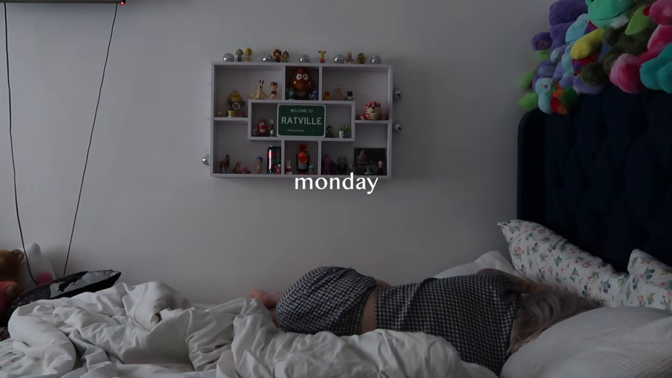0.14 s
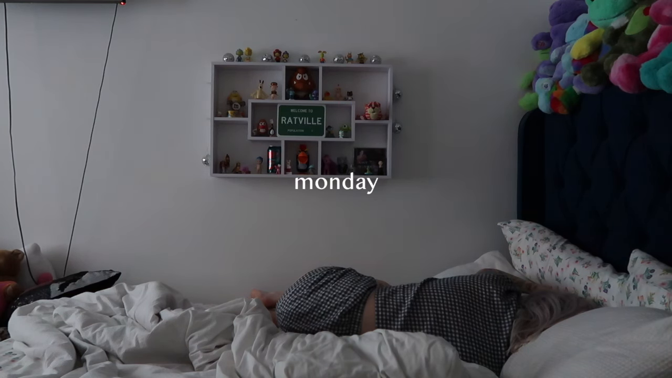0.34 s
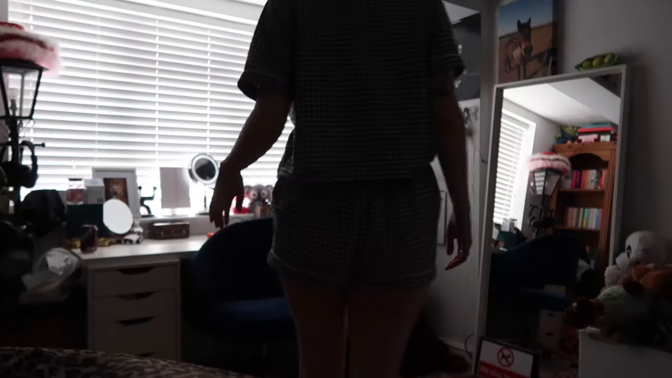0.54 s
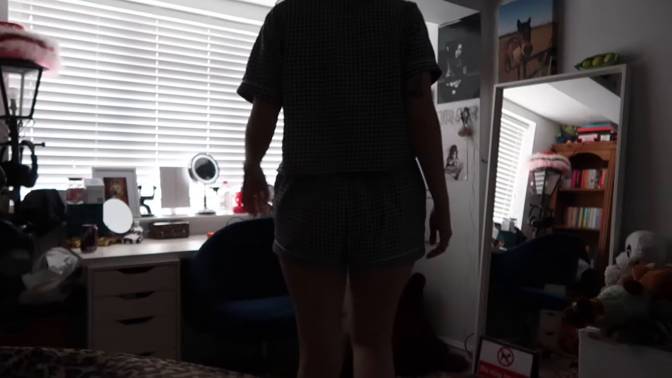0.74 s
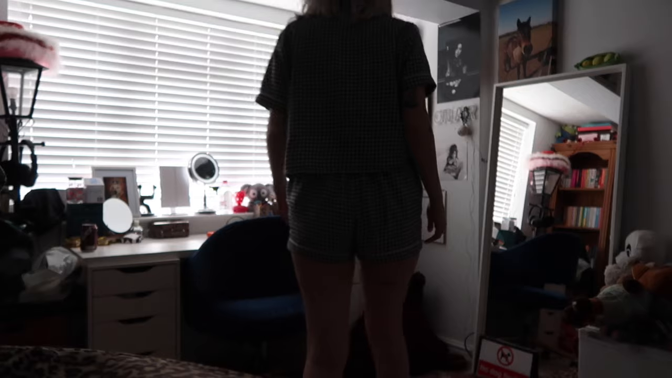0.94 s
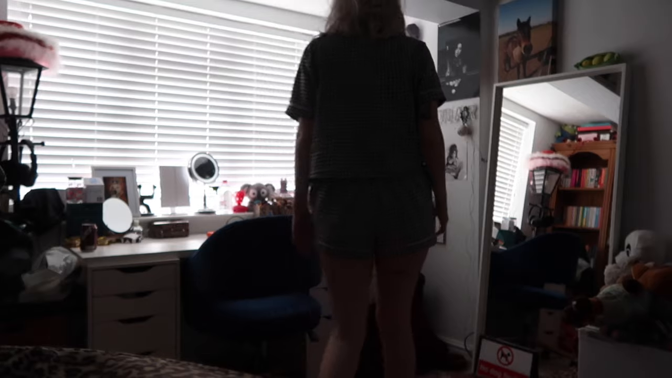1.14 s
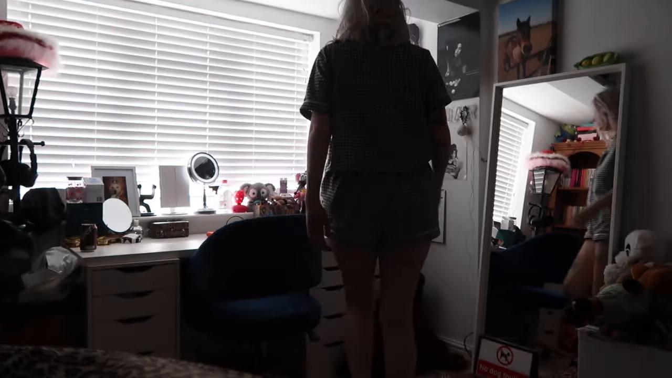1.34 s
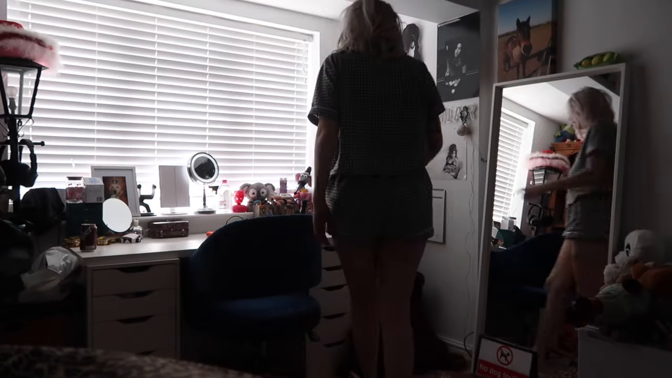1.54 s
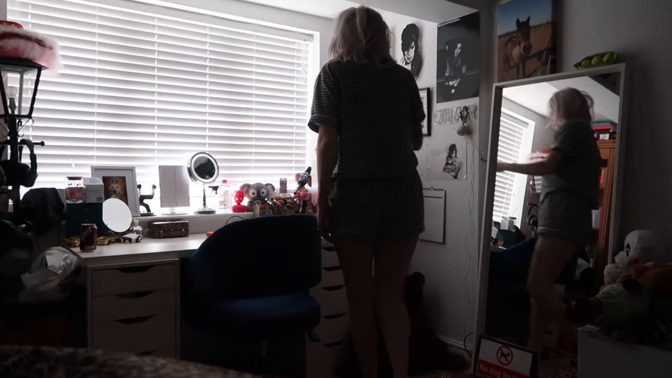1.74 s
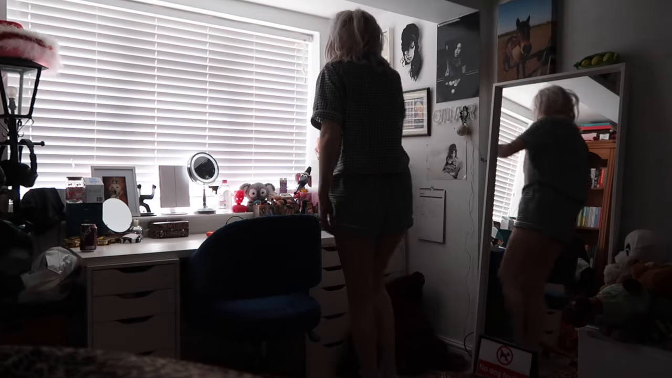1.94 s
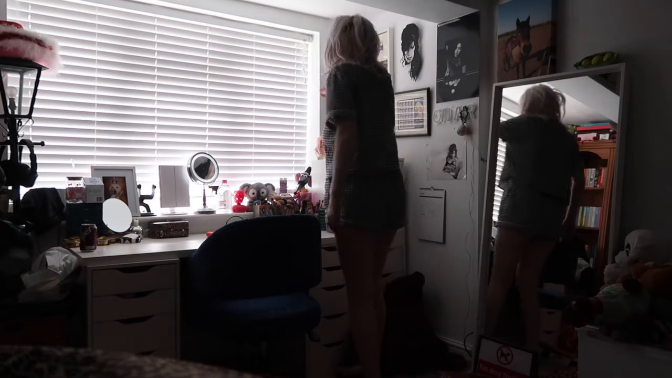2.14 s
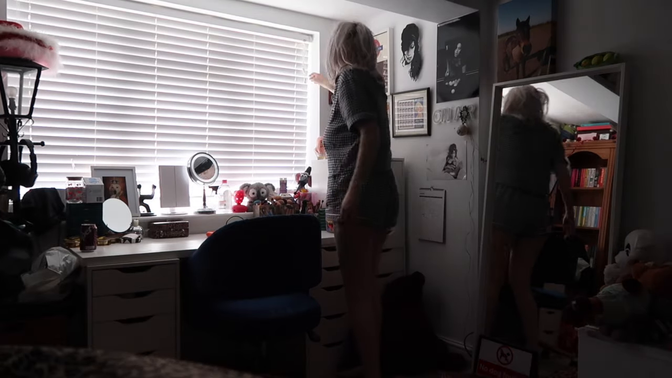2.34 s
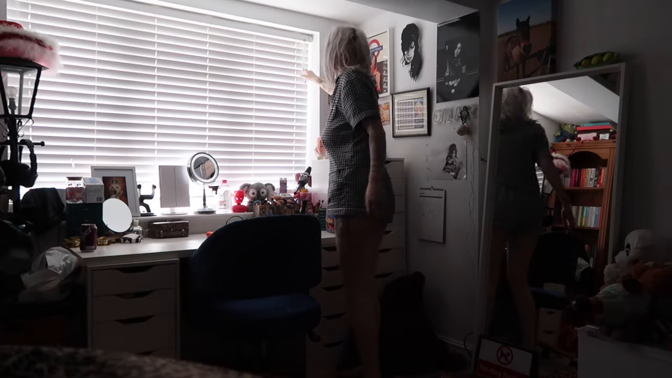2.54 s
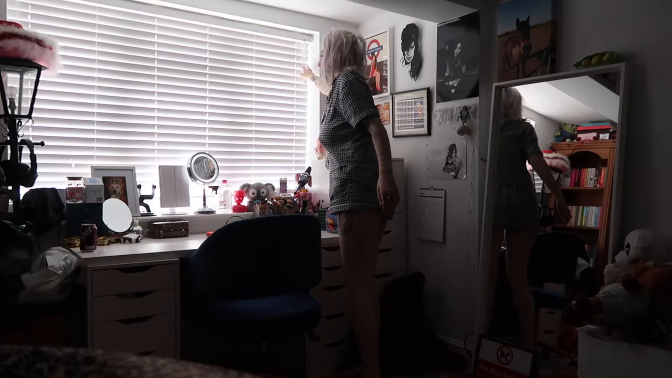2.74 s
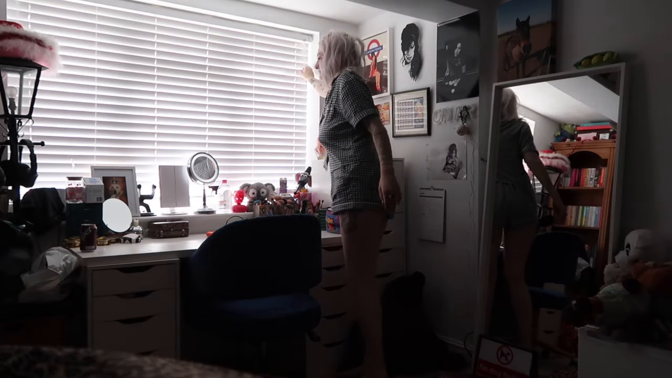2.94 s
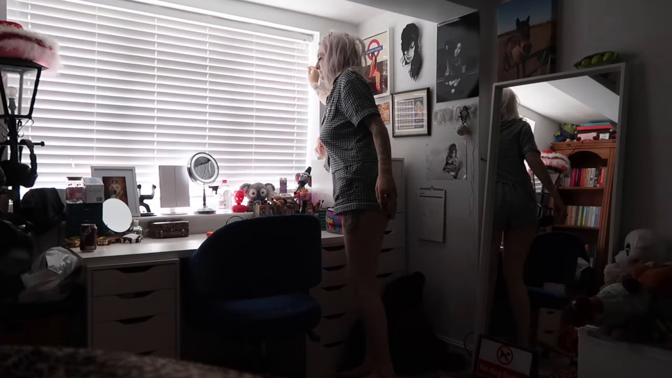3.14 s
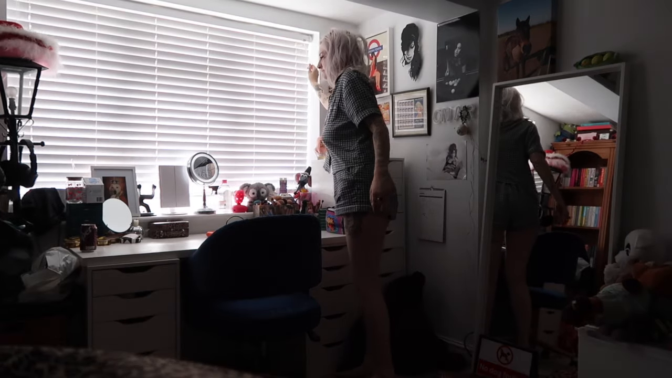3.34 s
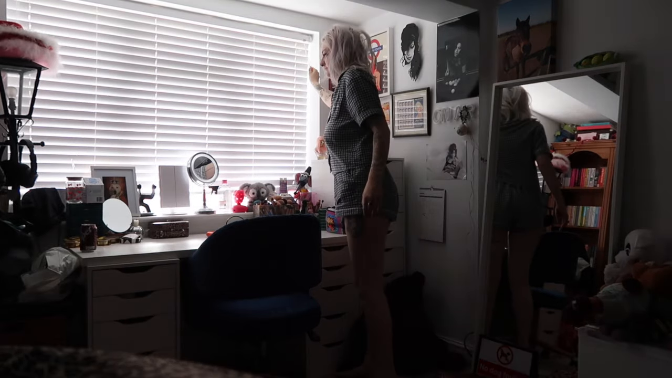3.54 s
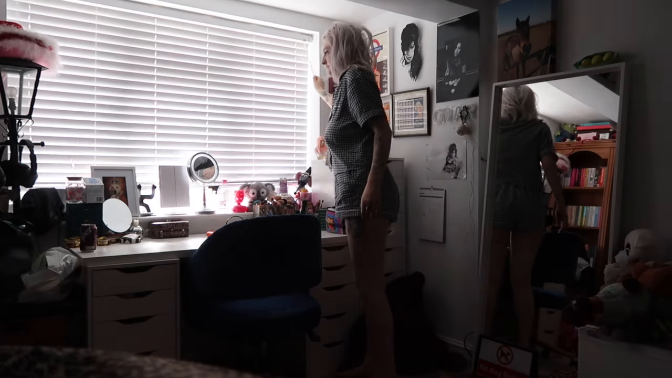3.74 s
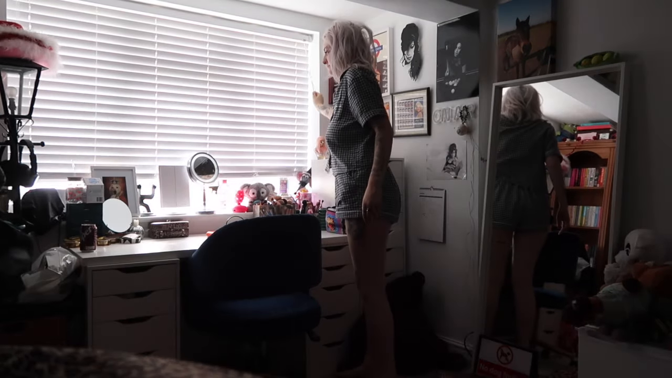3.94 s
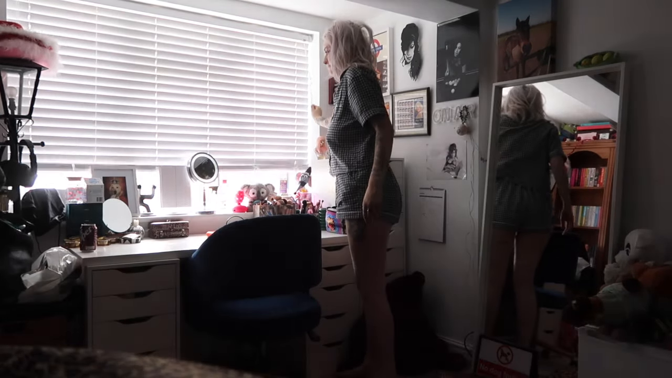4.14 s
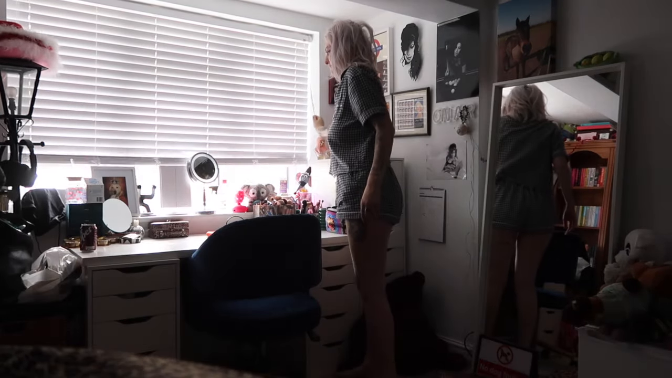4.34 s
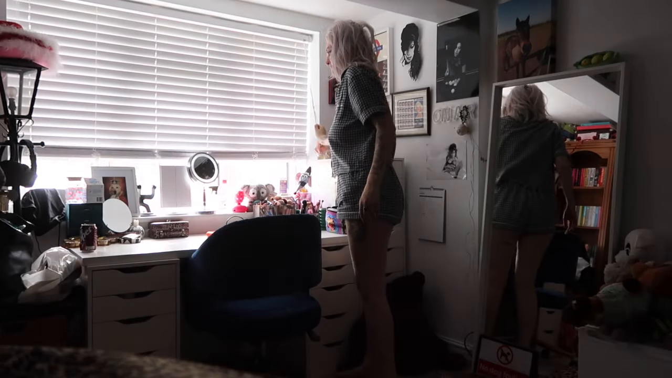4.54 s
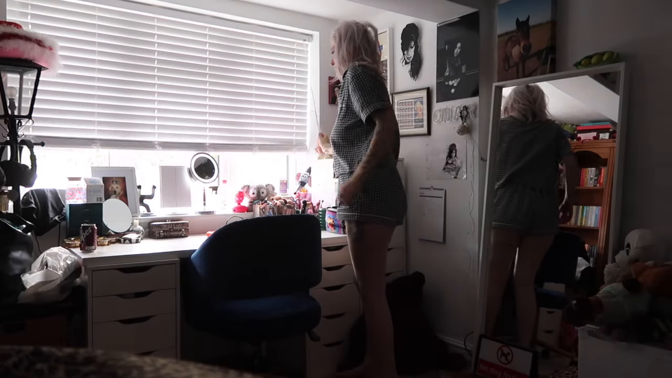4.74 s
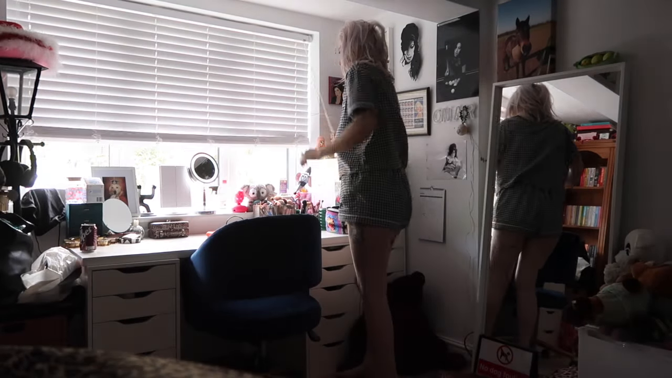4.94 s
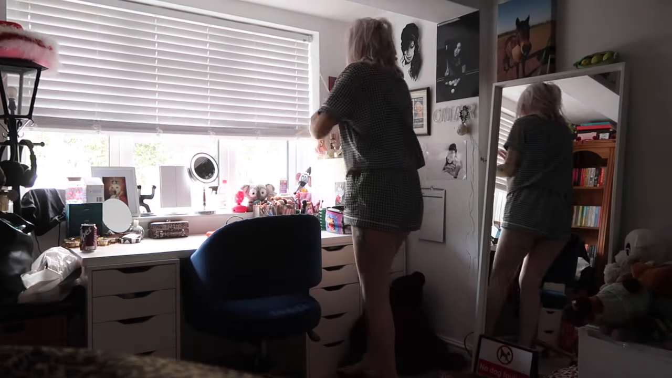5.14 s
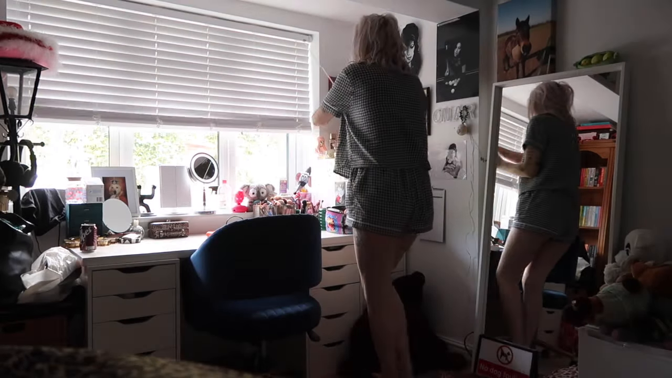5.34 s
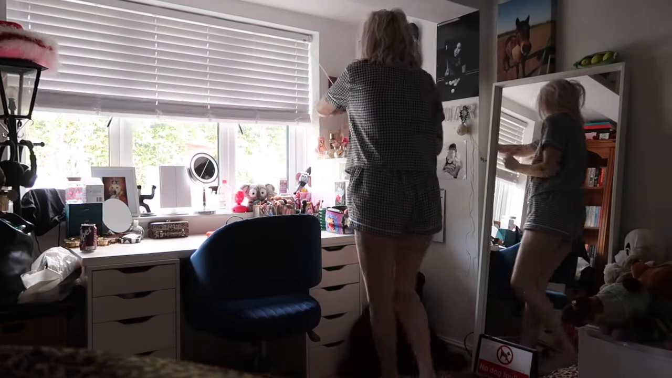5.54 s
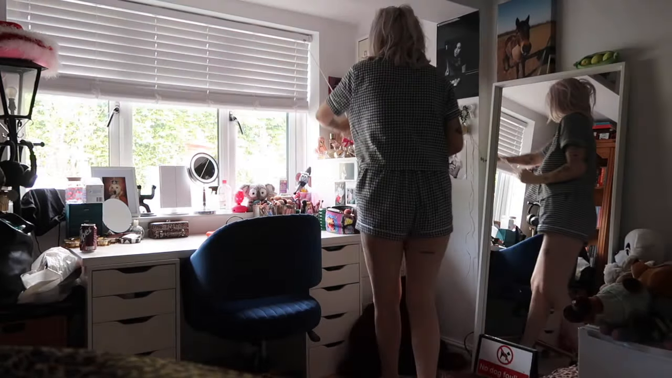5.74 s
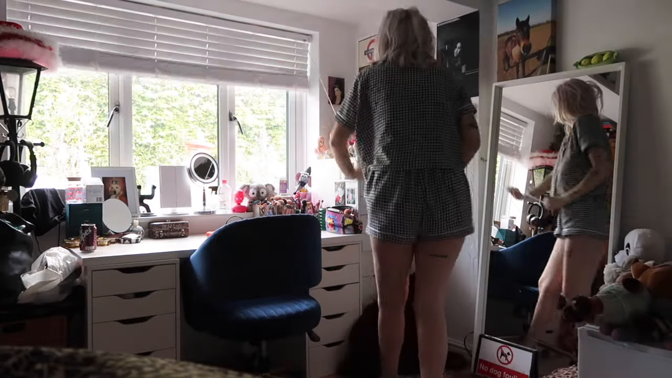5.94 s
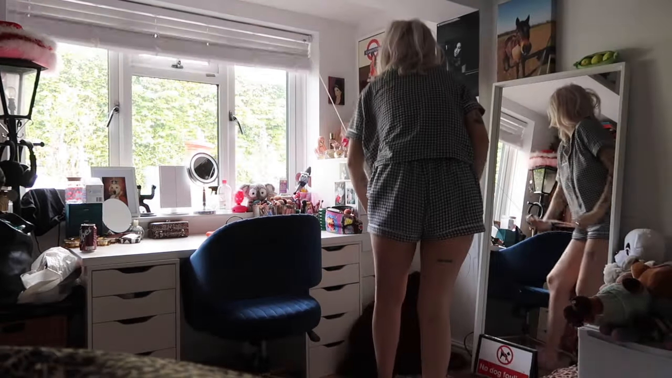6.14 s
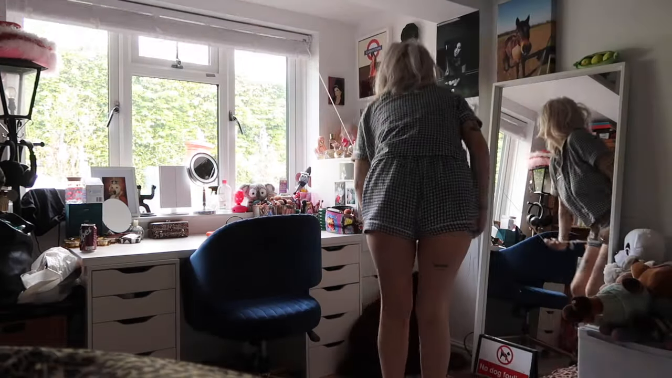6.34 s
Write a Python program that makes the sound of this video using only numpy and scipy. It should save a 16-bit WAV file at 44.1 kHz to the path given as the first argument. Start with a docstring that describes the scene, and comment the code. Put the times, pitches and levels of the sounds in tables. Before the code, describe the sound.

A quiet small bedroom, short soft reflections, faint low hum and hiss in close stereo. From 0.4 to 0.7 s dull footfalls knock the wooden floor; more come at 1.1 to 1.2 s with low thuds and small cracks, then softer ones near 1.7 s and the strongest, a sharp board crack, at 1.83 s. A light step at 2.3 s, then faint cord rustle, thin high squeaks and small slat ticks until 3.1 s. Clicks at 3.25 to 3.35 s begin the pull; scraping grows, with a cluster of clacks and rail bumps at 3.9 to 4.3 s. A short low groan at 4.4 s, then a steady raspy whirr, rising in pitch from 5.4 s, with brief chirps. From 5.8 s the rasp surges and slats snap hard and bright, loudest at 5.93 to 6.08 s, ringing briefly; last bumps follow to 6.35 s.

```python
"""Hauling up a slatted blind

Someone crosses a small bedroom over knocking floorboards, takes the cord of a blind and hauls it up.
Random touches, filtered and ringing, make the steps and slats; tiny slips and unsteady tones make the cord.
The slats shuffle as they gather and the stack clatters at the top, over a faint hum and hiss in stereo.
Levels in the tables are relative: gains on the layers trim them.
"""
import sys
import numpy as np
from scipy import signal
from scipy.fft import rfft, irfft, next_fast_len
from scipy.io import wavfile

SR = 44100
rng = np.random.default_rng(int(sys.argv[2]) if len(sys.argv) > 2 else 0)


def to_wav(sig):
    """Store sig (one row per channel, or 1-D mono) as 16-bit WAV at the path in sys.argv[1].

    Samples outside -1..1 are clipped; the rate is SR.
    """
    pcm = np.clip(np.atleast_2d(sig), -1, 1) * 32767
    pcm = np.round(pcm).astype(np.int16)
    wavfile.write(sys.argv[1], SR, pcm.T)  # frames by channels


N = 280957
TIME = np.arange(N) / SR

# tone colour of the slats: (frequency [Hz], level [dB])
SLAT_COLOUR = [(60, -22), (150, -32), (215, -10), (330, -4.5), (1000, 4), (1600, 3), (2400, 2.5),
               (3300, 4.5), (5000, -5), (7500, -16), (10500, -28), (15000, -39)]
# ringing tones of the blind: (frequency [Hz], level [dB], time to fall by 60 dB [s])
BLIND_RINGING = [(401, 7, 0.4), (513, 5, 0.15), (687, 11, 0.3), (819, 15, 0.42), (1012, 14, 0.36),
                 (1210, 7.5, 0.5), (1346, 14, 0.55), (1384, 10, 0.4), (1890, 9, 0.25), (2985, 0, 0.3),
                 (3166, 4.5, 0.4), (3342, 6, 0.4)]
# ringing tones of the headrail, the box the cord runs through: (frequency [Hz], level [dB], 60 dB fall [s])
HEADRAIL_RINGING = [(486, 3.5, 0.045), (836.5, 10, 0.079), (1212, -17, 0.14), (1330, 0, 0.032)]
# how freely the blind and its headrail ring over time: (time [s], ring level [dB])
RING_FREEDOM = [(3.3, -7), (4.2, -22), (4.7, -15), (5.95, -3), (6.08, -8)]
# the hand takes the cord: (time [s], cord rasp level [dB])
FIRST_TOUCH = (2.3, -67.5)


def undb(db):
    """Turn decibels into gain."""
    return 10 ** (np.asarray(db) / 20)


def unit(x):
    """Scale to an average (rms) strength of 1."""
    return x / np.sqrt(np.mean(x ** 2))


def follow(points, at=TIME, before=None):
    """Read a (time, value) table with straight lines between its points."""
    return np.interp(at, *np.transpose(points), left=before)


def shape(points, hz):
    """Read a (frequency, dB) table at the given frequencies, on a pitch-like scale."""
    f, db = np.transpose(points)
    return np.interp(np.log(hz + 1), np.log(f), db)


def convolve(x, response):
    """Filter x with a response and keep its length."""
    return signal.fftconvolve(x, response)[:len(x)]


def colour(x, points, centre_hz=1000, emphasis_db=0, octaves=0.66, size=4096):
    """Filter x to a given tone colour with one broad hump, without any sound ahead of its cause."""
    hz = np.fft.rfftfreq(size, 1 / SR)
    hump = np.exp(-.5 * (np.log2((hz + 1) / centre_hz) / octaves) ** 2)
    db = shape(points, hz) + emphasis_db * hump
    # folding the cepstrum makes the filter respond as early as it can (minimum phase)
    cepstrum = irfft(np.log(undb(db)))
    cepstrum[1:size // 2] *= 2
    cepstrum[size // 2 + 1:] = 0
    return convolve(x, irfft(np.exp(rfft(cepstrum))))


def ring(x, modes):
    """Let x set off fading tones, as an object does when struck; dB is the gain at each peak."""
    t = TIME[:SR // 2]
    response = 0
    for hz, db, t60 in modes:
        decay = np.log(1000) / t60
        peak = undb(db) * 2 * decay / SR
        response = response + peak * np.exp(-decay * t) * np.cos(2 * np.pi * hz * t)
    return convolve(x, response)


def walk(rate):
    """Wander randomly around 0, aiming for 'rate' new values per second."""
    knots = rng.standard_normal(N // 100)
    return np.interp(TIME * rate, np.arange(len(knots)), knots)


def slips(rate, scatter_db):
    """Tiny random clicks of uneven size, as when a surface sticks and slips 'rate' times per second."""
    happens = rng.random(N) < rate / SR
    direction = rng.choice([-1, 1], N)
    return happens * direction * undb(scatter_db * rng.standard_normal(N))


def tick(smear_s):
    """One hard touch; bending waves of different pitch arrive up to smear_s apart."""
    t = TIME[:SR // 2]
    hz = np.fft.rfftfreq(len(t), 1 / SR)
    lag_s = smear_s * np.interp(hz, np.linspace(0, SR / 2, 36), rng.random(36))
    # adding up the lags over frequency gives the phase that delays each pitch
    phase = 2 * np.pi * np.cumsum(lag_s) * hz[1]
    return irfft(np.exp(-1j * phase), len(t)) * (t < .1)


def contact(spread, clean_s=.0025, smear_s=.0015):
    """A short contact is mostly one tick; a longer one breaks up into a swell of small touches."""
    t = TIME[:SR // 2]
    touches = rng.standard_normal(len(t)) * undb(4.1 * rng.standard_normal(len(t)))
    touches *= np.exp(-t / spread) * (1 - np.exp(-2 * t / spread))
    touches /= np.sqrt(np.sum(touches ** 2))
    tick_share = np.exp(-spread / clean_s)
    return tick_share * tick(smear_s) + (1 - tick_share) * touches


def reverb(t60_low=0.19, t60_high=0.1, wet_db=-3, build_s=0.0023):
    """Dense reflections of a small furnished room; the treble dies first."""
    t = TIME[:SR // 2]
    noise = rng.standard_normal(len(t))
    low = signal.sosfilt(signal.butter(1, 3000, fs=SR, output="sos"), noise)
    high = noise - low
    tail = low * 1e3 ** (-t / t60_low) + high * 1e3 ** (-t / t60_high)
    tail *= 1 - np.exp(-t / build_s)
    return undb(wet_db) * tail / np.sqrt(np.sum(tail ** 2))


def bedroom(x, bounce=0.49, tail_db=0, likeness=0.26):
    """Direct sound, a ceiling bounce and a tail at two close microphones, with new reflections at each call."""
    # left-right difference against the sum, mostly wider in the treble: (frequency [Hz], level [dB])
    width = [(60, -40), (130, -30), (300, -15), (700, -26), (1300, -25), (2200, -22), (3300, -12),
             (4400, -5.5), (6500, 0), (8200, 1), (11000, 11), (15000, 15)]
    left_db = .18  # the left side is raised and the right side lowered by this
    early = np.zeros(SR // 2)
    early[0] = 1
    early[int(rng.uniform(.0052, .0059) * SR)] = bounce
    tail = reverb()
    across_tail = likeness * tail + np.sqrt(1 - likeness ** 2) * reverb()
    mid = convolve(x, early + undb(tail_db) * tail)
    across = convolve(x, early + undb(tail_db) * across_tail)
    # the difference between close microphones runs a quarter cycle ahead of their sum
    size = next_fast_len(len(x) + SR // 2)
    side_gain = undb(shape(width, np.fft.rfftfreq(size, 1 / SR)))
    side = irfft(1j * rfft(across, size) * side_gain, size)[:len(x)]
    return np.array([(mid + side) * undb(left_db), (mid - side) * undb(-left_db)])


def add(track, s, sound, db, tail_db=0):
    """Place a blow in the room; before the room, its level is that of its energy packed into 10 ms."""
    # the ceiling bounce of a knock grows as the blind climbs: (time [s], gain [ratio])
    ceiling = [(4.0, 0.25), (5.9, 0.6)]
    start = int(s * SR)
    blow = sound * undb(db) * np.sqrt(SR / 100 / np.sum(sound ** 2))
    heard = bedroom(blow, follow(ceiling, s), tail_db)
    track[:, start:start + heard.shape[1]] += heard[:, :max(N - start, 0)]


def room_tone(apart_hz=150, hum_waver_db=2, mid_db=1.0, side_db=0.0):
    """Rumble and a wavering hum shared by both microphones, and hiss that differs between them."""
    # tone colour of the rumble and hiss: (frequency [Hz], level [dB])
    air = [(12, -76.5), (20, 0.5), (43, -0.5), (108, -7), (153, -3.5), (205, -9), (324, -9.5), (583, -17),
           (742, -17), (826, -14.5), (919, -20.5), (1940, -21.5), (12000, -42), (15600, -49), (22000, -120)]
    # steady tones of the hum: (frequency [Hz], level at first [dB], level later [dB])
    hum = [(38, -60, -79), (92.2, -66, -64.5), (145, -60.5, -66.5), (198.7, -59.5, -70.5)]
    air_db, shift_s = -53.5, 0.44  # the hum levels start to change at shift_s
    mid = unit(colour(rng.standard_normal(N), air)) * undb(air_db + mid_db)
    side = unit(colour(rng.standard_normal(N), air)) * undb(air_db + side_db)
    side = signal.sosfilt(signal.butter(2, apart_hz, "high", fs=SR, output="sos"), side)
    for hz, first_db, later_db in hum:
        db = np.interp(TIME, [shift_s, shift_s + 0.054], [first_db, later_db])
        tone = unit(np.sin(2 * np.pi * hz * TIME + 0.63 * walk(2.9)))
        mid = mid + tone * undb(db + hum_waver_db * walk(7.2))
    return np.array([mid + side, mid - side])


def footsteps(tail_db=1.0):
    """Footfalls knock boards and set the floor ringing; a softer heel stirs less treble. Some boards crack."""
    # footfalls and board knocks: (time [s], level [dB], spread of the contact [s], centre [Hz],
    # emphasis there [dB], floor thud level [dB])
    footfalls = [(.408, -52, 0.021, 3000, 6, -72), (0.513, -36.5, 0.011, 160, 25.5, -38),
                 (.517, -42.5, 0.0068, 740, 16, -59), (0.653, -46.5, 0.013, 7500, 7, -47),
                 (1.099, -42.5, 0.013, 260, 10.5, -33), (1.117, -40, 0.016, 2950, 6, -31.5),
                 (1.171, -45.5, 0.0085, 850, 26, -51), (1.1999, -37.5, 0.0039, 1100, 3, -46),
                 (1.43, -81, 0.0326, 400, -2, -40.5), (1.6905, -39, 0.0095, 1850, 2.5, -39.5),
                 (1.735, -40, 0.0107, 111, 18.5, -48), (1.793, -38.5, 0.022, 98, 19, -50),
                 (1.8264, -22.5, 0.0055, 1910, 5, -33), (1.838, -28.5, .016, 246, 2.5, -50),
                 (2.264, -38, 0.015, 2550, 5.5, -43), (3.172, -45.5, 0.029, 109, 22, -48)]
    # sharp cracks of a board under load: (time [s], level [dB], centre [Hz], emphasis there [dB])
    board_cracks = [(1.1295, -52, 7000, 18), (1.2068, -42.5, 1730, 11), (1.2082, -44, 6860, 13),
                    (1.8304, -25.5, 2010, 9)]
    # tone colour of the boards: (frequency [Hz], level [dB])
    board_colour = [(60, -18), (140, 12.5), (215, -0.5), (300, 8), (600, 3.5), (1150, -2.5), (1700, -3),
                    (2400, -4), (3300, -7), (5000, -16.5), (8500, -25.5), (14000, -53)]
    # ringing tones of the wooden floor: (frequency [Hz], level [dB], time to fall by 60 dB [s])
    floor_ringing = [(35.4, 19, 0.32), (68, 12.5, 0.17), (107, 3.5, 0.28), (164, -8, 0.05), (287, -3, 0.29)]
    # push time of the heaviest step, and the drop in level that doubles it: lighter steps have softer heels
    hardest_heel_s, doubling_db = 0.00033, 22
    out, t = np.zeros((2, N)), TIME[:SR // 2]
    heaviest_db = max(step[1] for step in footfalls)
    for s, db, spread, hz, emphasis_db, thud_db in footfalls:
        heel_s = hardest_heel_s * 2 ** ((heaviest_db - db) / doubling_db)
        knock = colour(contact(spread), board_colour, hz, emphasis_db)
        thud = ring(t * np.exp(-t / heel_s), floor_ringing)
        add(out, s, knock, db, tail_db)
        add(out, s + spread / 2, thud, thud_db, tail_db)
    for s, db, hz, emphasis_db in board_cracks:
        crack = colour(tick(smear_s=0.00309), board_colour, hz, emphasis_db)
        add(out, s, crack, db, tail_db)
    return out


def slat(s, touch, hz, emphasis_db):
    """A touch on a slat; the blind rings on, more freely at some moments than others."""
    knock = colour(touch, SLAT_COLOUR, hz, emphasis_db)
    return knock + undb(follow(RING_FREEDOM, s)) * ring(knock, BLIND_RINGING)


def clatter(tail_db=1.5):
    """Slats strike each other, the bottom rail bumps and scrapes, and some slats snap together hard."""
    # knocks and brushes of the slats: (time [s], level [dB], spread of the contact [s], centre [Hz],
    # emphasis there [dB])
    clacks = [(2.38, -52, 0.094, 1690, 34), (2.611, -50, 0.0027, 1350, 19), (2.908, -48, 0.0053, 3780, 3),
              (3.039, -50, 0.0019, 2180, 34), (3.149, -41, 0.014, 2020, 16), (3.2449, -32, 0.0036, 3600, 9),
              (3.339, -39, 0.012, 1300, 19), (3.8837, -32.5, 0.0036, 1490, 13),
              (3.8875, -31, 0.0027, 4000, 12), (3.969, -30.5, 0.0041, 1500, 19),
              (3.998, -37, 0.0034, 9000, 15), (4.011, -34.5, 0.012, 9900, 17.5),
              (4.068, -42, .008, 1320, 14), (4.14, -39, 0.0066, 1210, 12), (4.231, -42, 0.0055, 2680, 24),
              (4.754, -42, 0.0033, 2340, 25), (5.049, -42, 0.0079, 1920, 10),
              (5.803, -27.5, 0.0076, 1100, 10), (5.832, -29, 0.015, 1190, -1),
              (5.883, -27, 0.0032, 940, 10), (6.0402, -17, 0.0034, 9300, 11),
              (6.0462, -18, 0.0048, 8250, 7), (6.076, -21, 0.0037, 1310, -8),
              (6.177, -27, 0.0091, 3900, -3)]
    # bumps and scrapes of the swinging bottom rail: (time [s], level [dB], spread of the contact [s], centre [Hz])
    bumps = [(3.344, -36, 0.025, 476), (3.545, -45.5, 0.033, 393), (3.729, -43, 0.012, 493),
             (3.77, -40.5, 0.012, 500), (3.845, -35.5, 0.035, 307), (3.97, -32.5, .006, 530),
             (4.006, -37.5, 0.0039, 394), (4.067, -35.5, 0.026, 390), (4.135, -35, 0.022, 374),
             (4.195, -36, 0.034, 340), (4.259, -43, 0.019, 373), (4.32, -42.5, 0.013, 416),
             (4.415, -40.5, 0.0028, 343), (6.045, -37, 0.02, 423), (6.215, -34, 0.023, 495),
             (6.351, -26.5, 0.013, 382)]
    # hard snaps of slat on slat, at lift-off and at the top: (time [s], level [dB], centre [Hz],
    # emphasis there [dB])
    snaps = [(3.9659, -24, 1610, 24), (4.0136, -33, 1800, 19), (5.808, -51, 1490, 6),
             (5.8385, -30, 2500, -1), (5.9037, -31, 2600, 5), (5.9325, -16, 3450, 2.5),
             (5.9617, -18, 3000, 3), (5.9883, -20.5, 4350, 3), (6.0719, -18.5, 3830, 1)]
    bump_emphasis_db = 18
    snap_smear_s, snap_tail_db = .0024, -4  # most a pitch can lag in a snap, and its room tail
    out = np.zeros((2, N))
    for s, db, spread, hz, emphasis_db in clacks + [(*bump, bump_emphasis_db) for bump in bumps]:
        add(out, s, slat(s, contact(spread), hz, emphasis_db), db, tail_db)
    for s, db, hz, emphasis_db in snaps:
        add(out, s, slat(s, tick(snap_smear_s), hz, emphasis_db), db, snap_tail_db)
    return out


def effort():
    """Gain of the cord rasp: it creeps up from the first touch, then follows the pull."""
    # effort of the pull: (time [s], cord rasp level [dB])
    pull_levels = [(3.1, -64), (3.35, -54), (3.52, -56), (3.7, -49), (3.85, -44.5), (3.94, -45.5),
                   (4.1, -48), (4.5, -49), (4.72, -44.5), (5.0, -47), (5.45, -46.5), (5.7, -42.5),
                   (5.79, -38.5), (5.9, -34.5), (5.99, -31.5), (6.15, -40.5), (6.37, -45)]
    return undb(follow([FIRST_TOUCH, *pull_levels], before=-120))


def rattle(per_s=55, scatter_db=2.0, spread_s=0.0033, ring_db=-10, level_db=-13):
    """Slats tap each other at random as they gather, harder the harder the pull."""
    taps = convolve(slips(per_s, scatter_db), contact(spread_s))
    taps = colour(taps, SLAT_COLOUR)
    ringing = undb(ring_db) * ring(taps, BLIND_RINGING)
    return bedroom(unit(taps + ringing) * effort() * undb(level_db))


def squeaks(rough_db=5.0):
    """Now and then the cord catches and sings on an unsteady, sometimes sliding pitch."""
    # squeaks of the cord: (time [s], pitch [Hz], level [dB], length [s], glide [Hz per s])
    squeak_list = [(2.38, 4680, -65, .035, 1200), (2.53, 4800, -72, 0.1, 1000), (2.79, 4880, -71, .08, 400),
                   (5.07, 1324, -54, 0.024, 0), (5.32, 5300, -62, .02, 0), (5.388, 1305, -57, .03, 300),
                   (5.7, 1310, -49, 0.027, 500)]
    waver_share, waver_per_s = 0.04, 400  # pitch unsteadiness as a share of it, and new values per second
    out = np.zeros(N)
    for s, hz, db, length, glide in squeak_list:
        pitch = (hz + glide * (TIME - s)) * (1 + waver_share * walk(waver_per_s))
        tone = np.sin(2 * np.pi * np.cumsum(pitch) / SR)
        tone = unit(tone * undb(rough_db * walk(waver_per_s)))
        out += tone * undb(db) * np.exp(-((TIME - s) / length) ** 2)
    return bedroom(out)


def cord_tone(curve, partials_db, waver_share=0.0281, rough_db=2.0, patchy_db=3.0):
    """The cord sings on a rough pitch and its multiples, following a (time, pitch, level) table."""
    s, hz, db = np.transpose(curve)
    pitch = np.interp(TIME, s, hz) * (1 + waver_share * walk(120))
    phase = 2 * np.pi * np.cumsum(pitch) / SR
    tone = 0
    for k, partial_db in enumerate(partials_db, 1):
        partial_level_db = partial_db + rough_db * walk(60) + patchy_db * walk(9.9)
        tone = tone + np.sin(k * phase) * undb(partial_level_db)
    return unit(tone) * undb(np.interp(TIME, s, db, left=-120, right=-120))


def groan(level_db=-3.5):
    """A short, low groan of the cord as it slows between two pulls; its pitch mostly falls."""
    # (time [s], pitch [Hz], level [dB])
    groan_curve = [(4.398, 310, -58), (4.412, 285, -51), (4.419, 262, -39), (4.432, 243, -43),
                   (4.45, 246, -41), (4.472, 255, -45), (4.49, 255, -60)]
    # levels of the pitch and its multiples, in order: (level [dB])
    partials_db = [3, -21, -4, -16, -2]
    tone = cord_tone(groan_curve, partials_db, waver_share=.06, rough_db=4, patchy_db=1)
    return bedroom(tone * undb(level_db), bounce=.2, tail_db=-7)


def whirr(rail_db=0, level_db=-5):
    """The cord hums over its roller and makes the headrail ring, most where a partial meets its resonance."""
    # (time [s], pitch [Hz], level [dB])
    whirr_curve = [(4.52, 375, -67), (4.65, 410.5, -51), (4.73, 444.4, -58), (4.83, 423.2, -56),
                   (4.98, 411, -55.5), (5.08, 405, -57), (5.2, 402.3, -53), (5.3, 408, -51),
                   (5.38, 421, -55.5), (5.45, 455, -57), (5.52, 492, -50), (5.61, 535, -54),
                   (5.75, 584, -64)]
    # levels of the pitch and its multiples, in order: (level [dB])
    partials_db = [-3, 0, -9]
    tone = cord_tone(whirr_curve, partials_db) * undb(level_db)
    return bedroom(tone + undb(rail_db) * ring(tone, HEADRAIL_RINGING))


def lock_scrape(flutter_db=1.5, level_db=-1):
    """Sticking and slipping in the cord lock rings two resonances that wander and flutter, each on its own."""
    # scrape of the cord in its lock, which bites and lets go: (time [s], level [dB])
    scrape_levels = [(3.0, -66), (3.3, -67), (3.36, -50), (3.5, -56), (3.75, -47.5), (4.1, -45.5),
                     (4.4, -47), (4.48, -53.5), (4.68, -46), (4.81, -49), (4.88, -46), (4.94, -50),
                     (5.05, -45.5), (5.2, -51), (5.45, -54), (5.53, -46), (5.74, -48), (5.84, -39.5),
                     (6.1, -50), (6.37, -52.5)]
    # resonances of the scrape: (frequency [Hz])
    resonances_hz = [2050, 2270]
    width_hz, wander_share = 330, .025
    low_pass = signal.butter(2, width_hz / 2, fs=SR, output="sos")
    scrape = 0
    for hz in resonances_hz:
        centre = hz * (1 + wander_share * walk(14))
        friction = slips(rate=350, scatter_db=4.0) * np.exp(2j * np.pi * rng.random(N))
        # smooth the slips at zero frequency, then shift them up to the wandering centre
        rings = signal.sosfilt(low_pass, friction)
        carrier = np.exp(2j * np.pi * np.cumsum(centre) / SR)
        scrape = scrape + np.real(rings * carrier) * undb(flutter_db * walk(30))
    return bedroom(unit(scrape) * undb(level_db + follow(scrape_levels, before=-120)))


def sway():
    """Gain of the slat shuffle: it builds towards each jolt and dies away after it."""
    # jolts that set the slats swaying (taking the cord, lifting off the sill, reaching the top):
    # (time [s], slat shuffle level [dB])
    jolts = [(2.36, -57.5), (4.1, -43.5), (6.0, -43.5)]
    rise_db_per_s, fall_db_per_s = 29, 39
    power = 0
    for s, db in jolts:
        drop_db = np.maximum(rise_db_per_s * (s - TIME), fall_db_per_s * (TIME - s))
        power = power + undb(db - drop_db) ** 2
    return np.sqrt(power) * (TIME > FIRST_TOUCH[0])


def pull(cord_db=1.0, rail_db=-5, shuffle_db=-1):
    """The cord slips through several guides along the headrail and rings it while the slats slide together."""
    # tone colour of the cord: (frequency [Hz], level [dB])
    cord_colour = [(300, -19), (1000, -5.5), (1750, -5), (2300, -4.5), (2700, -4), (3500, -6), (4400, -10),
                   (5100, -8), (6500, -17), (9000, -23), (11500, -46), (15000, -89)]
    # tone colour of the slat shuffle: (frequency [Hz], level [dB])
    shuffle_colour = [(60, -14), (110, 7.5), (210, -1), (290, 7.5), (380, 2), (560, -1), (800, -6.5),
                      (1500, -0.5), (4000, -70)]
    # hump in the rasp of each cord guide: (frequency [Hz])
    guides_hz = [2950, 3780, 5170]
    guide_emphasis_db = 3
    rasp, slide = effort(), sway()
    rail_level_db = rail_db + follow(RING_FREEDOM) / 2
    low_pass = signal.butter(2, 5000, fs=SR, output="sos")
    out = 0
    for guide_hz in guides_hz:
        # each guide grips unevenly, and each resonance of the rail sings in fits of its own
        friction = slips(rate=600, scatter_db=4.0) * undb(2.2 * walk(32))
        singing = sum(ring(friction, [mode]) * undb(3.5 * walk(18)) for mode in HEADRAIL_RINGING)
        cord = unit(colour(friction, cord_colour, guide_hz, guide_emphasis_db, octaves=0.3))
        rail = unit(signal.sosfilt(low_pass, singing))
        slats = unit(colour(slips(rate=330, scatter_db=6.0), shuffle_colour))
        pulled = rasp * (cord * undb(cord_db) + rail * undb(rail_level_db))
        out = out + bedroom(pulled + slats * slide * undb(shuffle_db))
    return out / np.sqrt(len(guides_hz))


def scene(steps_db=0.13, clatter_db=-0.8, pull_db=-2, squeak_db=-2):
    """Steps, then the blind, over the tone of the room."""
    steps = undb(steps_db) * footsteps()
    slats = undb(clatter_db) * clatter() + rattle()
    cord = undb(squeak_db) * squeaks() + groan() + whirr() + lock_scrape() + undb(pull_db) * pull()
    return room_tone() + steps + slats + cord


def record(dry):
    """A steep low-pass filter removes the highest treble."""
    top_hz = 15300
    return signal.sosfilt(signal.ellip(8, .2, 70, top_hz, fs=SR, output="sos"), dry)


dry = scene()
out = record(dry)
to_wav(out)
```